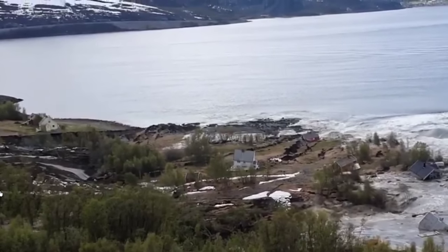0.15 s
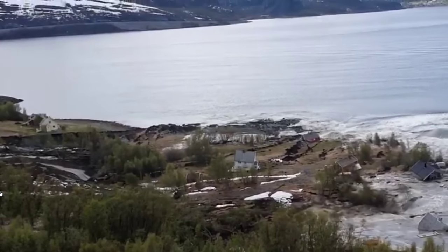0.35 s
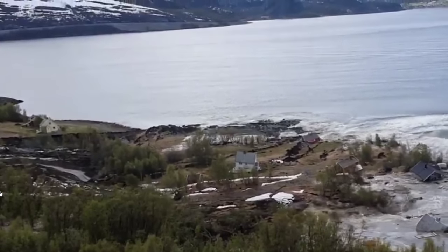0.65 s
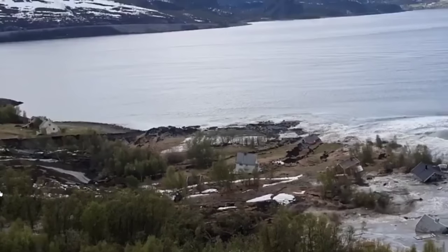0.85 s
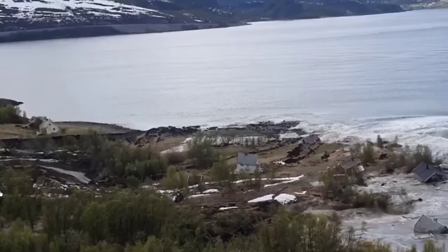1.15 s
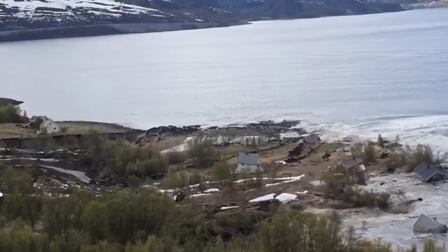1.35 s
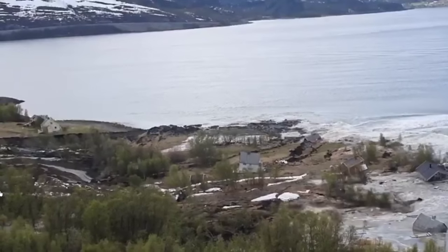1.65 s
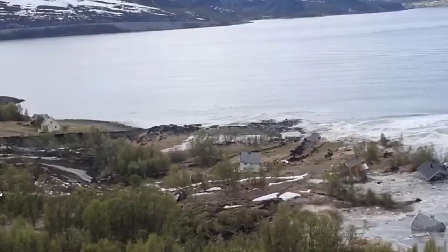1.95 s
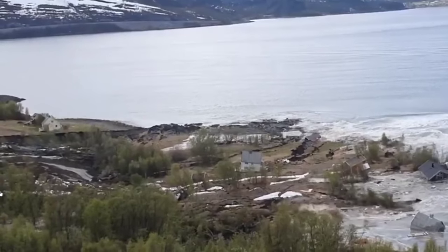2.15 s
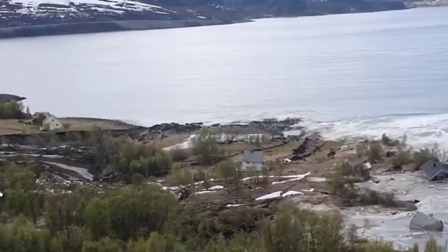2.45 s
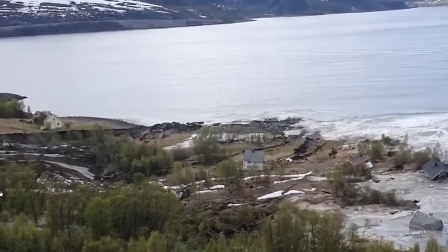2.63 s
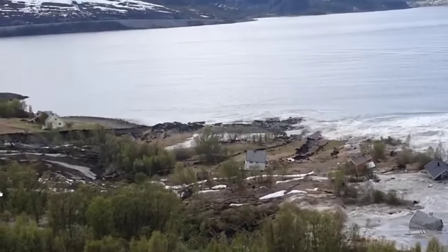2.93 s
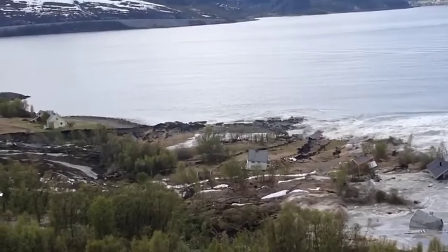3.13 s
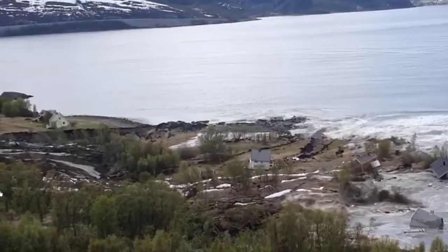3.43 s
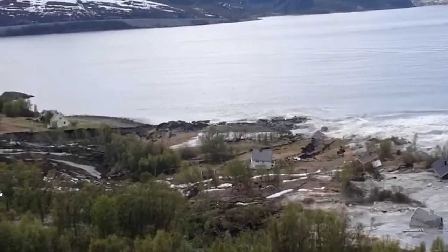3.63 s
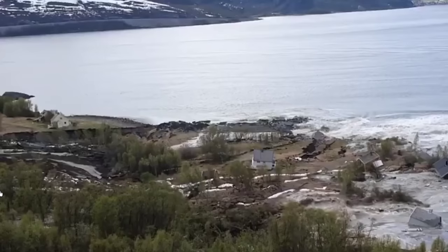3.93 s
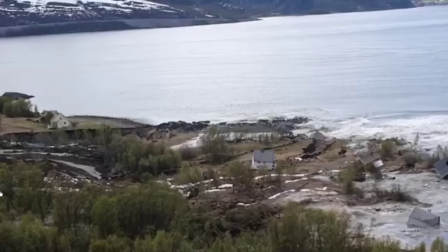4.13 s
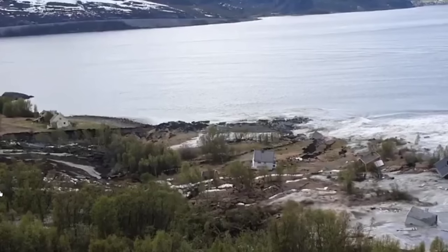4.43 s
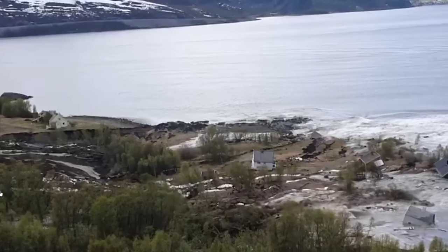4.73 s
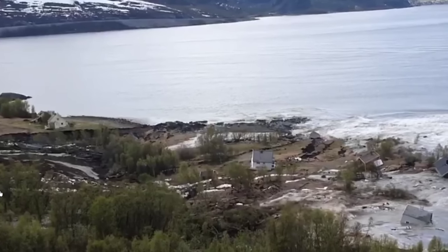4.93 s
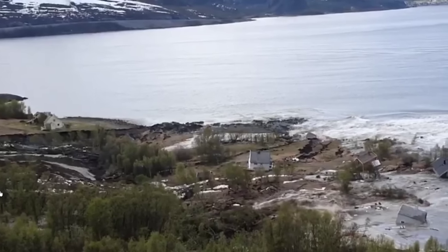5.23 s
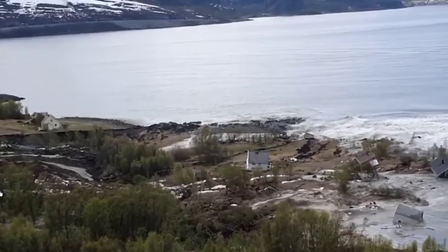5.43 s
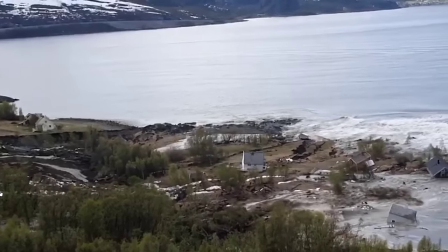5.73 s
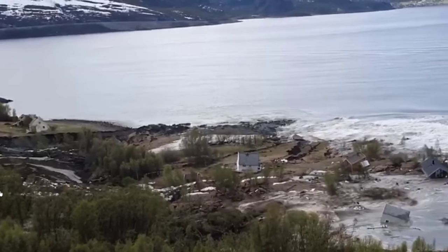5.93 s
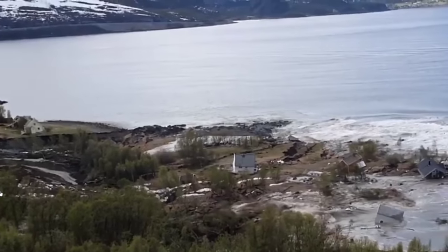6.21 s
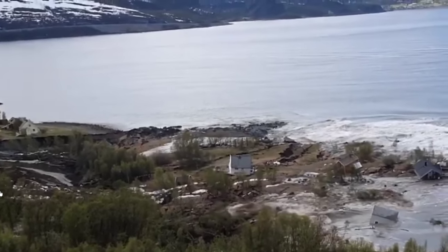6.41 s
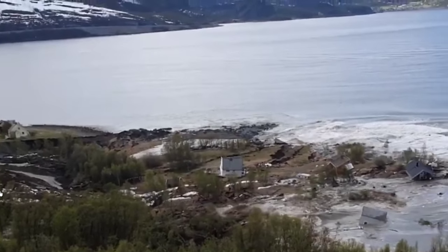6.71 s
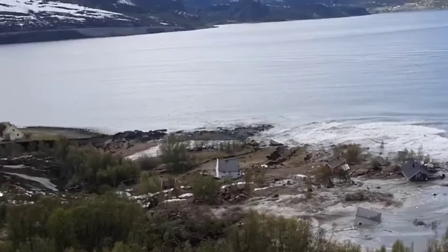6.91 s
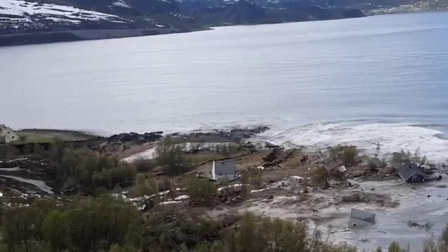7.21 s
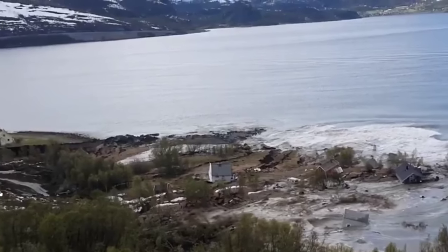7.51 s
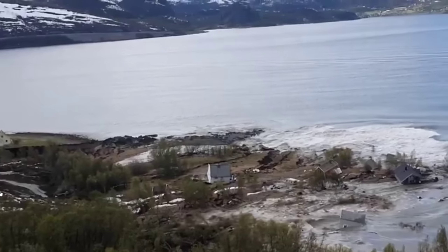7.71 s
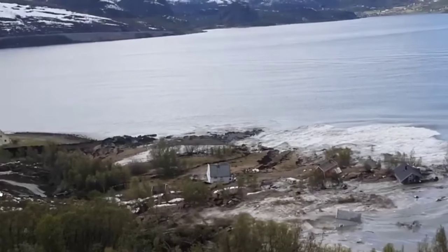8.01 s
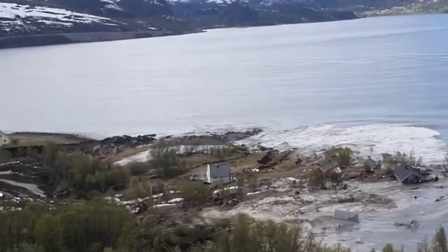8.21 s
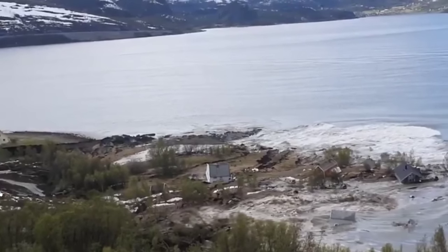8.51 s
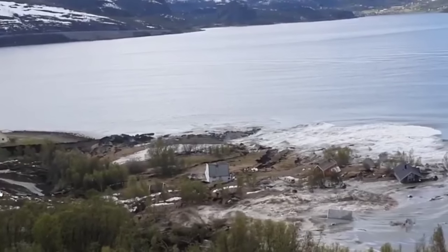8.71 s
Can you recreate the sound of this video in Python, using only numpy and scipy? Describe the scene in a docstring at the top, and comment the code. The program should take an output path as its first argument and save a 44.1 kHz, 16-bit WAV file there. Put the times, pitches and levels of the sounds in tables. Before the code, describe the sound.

Outdoors on a hillside above the sea, wind rumbles and thumps on the microphone over the constant distant roar of sliding earth and churning water. Wood breaks with sharp cracks and ragged splitting right away, and again a few seconds later. Smaller clusters of snaps come after, over a light crackle of debris. Toward the end the breaks thin out, a few twigs tick and the wind grows stronger.

```python
"""A landslide pours into the sea far below: churning earth and water make a steady roar. Trees and timber snap,
each break sounding through three coloured bands, and twice they split in a long run of small slips. Small
debris crackles, thin twigs tick, and the breaking wood echoes off the slope. Wind buffets and thumps both
microphone openings, and something close by rustles faintly."""
import sys
import numpy as np
from scipy import signal
from scipy.fft import rfft, irfft, next_fast_len
from scipy.io import wavfile
from scipy.ndimage import uniform_filter1d, map_coordinates

SR = 44100
rng = np.random.default_rng(int(sys.argv[2]) if len(sys.argv) > 2 else 0)


def store_wav(level_fs):
    """Save 16-bit WAV to argv[1]."""
    pcm = np.round(np.clip(np.atleast_2d(level_fs), -1, 1) * 32767)
    wavfile.write(sys.argv[1], SR, pcm.T.astype(np.int16))


N = 390726


def amp(db):
    """Turn decibels into a gain to multiply by."""
    return 10 ** (np.asarray(db) / 20)


def unit(x):
    """Scale a signal to an average (rms) strength of 1."""
    return x / np.sqrt(np.mean(x ** 2) + 1e-20)


def along(points, hz):
    """Read between (f/Hz, value) points on a log frequency axis."""
    freqs, values = np.transpose(points)
    return np.interp(np.log(hz + 1), np.log(freqs + 1), values)


def curves(rows):
    """One value per sample for each column after the time."""
    times, *columns = np.transpose(rows)
    return [np.interp(np.arange(N) / SR, times, column) for column in columns]


def wobble(rate):
    """A smooth curve through `rate` random values a second."""
    return map_coordinates(rng.standard_normal(int(N * rate / SR) + 4), [np.arange(N) * rate / SR])


def filtered(x, response):
    """Multiply each frequency in x by response(hz)."""
    size = next_fast_len(N + SR // 2)
    return irfft(rfft(x, size) * response(np.fft.rfftfreq(size, 1 / SR)), size)[..., :N]


def rush(spectrum, likeness, patchy_db):
    """Stereo noise of strength 1 with random louder and softer patches in time and pitch."""
    cells = signal.stft(rng.standard_normal((2, N + 512)), nperseg=512)[2]
    patches = uniform_filter1d(rng.standard_normal(cells.shape[1:]), size=6, axis=0)
    patches = uniform_filter1d(patches, size=10, axis=1)
    pair = signal.istft(cells * amp(patchy_db * unit(patches)), nperseg=512)[1][:, :N]

    def colour(hz):
        angle = np.arccos(np.clip(along(likeness, hz), -1, 1)) / 2  # 0 makes left and right the same
        return amp(along(spectrum, hz)) * [np.cos(angle), np.sin(angle)]
    mid, side = filtered(pair, colour)
    return unit(np.array([mid + side, mid - side]))


def rattle(blows, t60):
    """Noise that jumps at each blow, then fades by 60 dB in t60 seconds."""
    fade = amp(-60 / (t60 * SR))
    return signal.lfilter([1], [1, -fade], blows) * rng.standard_normal(N)


def slide():
    """Earth and water churn; tumbling debris roughens the roar in soft-edged swells."""
    # strength of the roar: t/s, level/dB
    loudness = [(0, -27), (.7, -28), (2.3, -29.5), (3, -27), (3.8, -28), (5.3, -28), (6.6, -29),
                (8.5, -27.5), (8.86, -29)]
    # tone of the roar: f/Hz, level/dB
    spectrum = [(88, -39.5), (150, -9), (276, -2), (356, -2), (475, -6), (515, -3), (655, -1), (1240, -10),
                (1550, -11), (1750, -7), (1940, -9), (2160, -19.5), (2450, -13.5), (2650, -18), (3050, -16),
                (3600, -19.5), (3800, -23.5), (4150, -23.5), (4400, -32.5), (4680, -27), (5090, -32.5),
                (6900, -35.5), (8970, -77.5), (15200, -120)]
    # how alike left and right are: f/Hz, likeness (1 = the same)
    likeness = [(60, 0.23), (180, 1), (550, 0.87), (1650, 0.64), (3500, 0.62), (4970, 0.13), (6500, .05)]
    roar_db, = curves(loudness)
    knocks = (rng.random(N) < 60 / SR) * rng.uniform(0, .35, N)  # about 60 a second
    t = np.arange(SR // 10) / SR
    swell = amp(-60 * t / 0.12) * (1 - np.exp(-t / 0.00069)) ** 2
    tumble = 1 + signal.fftconvolve(knocks, swell)[:N]
    churn = tumble * rush(spectrum, likeness, patchy_db=1.39)
    return amp(roar_db + 0.26 * wobble(5.5)) * unit(churn)


def wind():
    """Swirling air buffets each microphone, brighter as it grows; the strongest swirls thump."""
    # strength of the buffeting: t/s, level/dB
    loudness = [(0, -28), (.42, -28.5), (1.0, -29), (1.73, -29), (2.3, -29), (2.8, -26), (3.0, -31),
                (3.3, -30.5), (3.6, -31.5), (4.64, -32), (5.5, -34.5), (5.85, -27.5), (6.46, -28),
                (6.78, -25), (7.2, -25.5), (7.38, -25.5), (7.72, -24.5), (7.92, -25.5), (8.1, -25),
                (8.3, -25), (8.52, -25), (8.86, -25.5)]
    # tone of the buffeting: f/Hz, level/dB
    spectrum = [(12, -48.5), (20, -11.5), (81, 2.5), (161, -7), (244, -9), (341, -9), (447, -14.5),
                (900, -31.5), (1170, -55.5), (1980, -120)]
    # the strongest swirls: t/s, level/dB, f/Hz
    thumps = [(0.009, -18.5, 95), (.5, -20, 90), (.53, -19.5, 90), (0.564, -16, 89.4), (.61, -21.5, 85),
              (.2, -19, 70), (.43, -20, 75), (0.813, -23.5, 98.4), (0.951, -19, 64), (1, -15.5, 85),
              (1.151, -21, 66.5), (1.209, -16.5, 79.4), (1.34, -25, 85), (1.516, -23.5, 75.3),
              (1.59, -17, 103.6), (1.88, -25, 110), (1.942, -19, 70), (2.025, -18.5, 85.6),
              (2.146, -15.5, 84), (2.296, -15, 77.3), (2.36, -20.5, 94.4), (2.45, -22, 86),
              (2.501, -18.5, 111), (2.687, -13, 80.3), (2.818, -26.5, 80), (2.881, -22, 83.3),
              (3.111, -19.5, 74.5), (3.327, -19, 86.4), (4.035, -20, 87), (5.75, -22.5, 65.4),
              (5.935, -18, 101.6), (6.24, -21, 70.7), (6.371, -19.5, 70.3), (6.544, -21, 78),
              (6.766, -15, 98), (6.796, -14, 82.5), (6.83, -14, 81.3), (7.062, -19, 76.6),
              (7.142, -14.5, 97), (7.228, -17, 100), (7.31, -22.5, 80), (7.425, -19, 62.5),
              (7.514, -22.5, 99.5), (7.599, -14.5, 87.5), (7.678, -11, 110.7), (7.735, -19, 62),
              (7.799, -19, 54.5), (7.98, -22.5, 82), (8.105, -19, 404), (8.157, -14.5, 394),
              (8.183, -12.5, 445), (8.205, -11.5, 83.6), (8.345, -20, 60), (8.4, -19.5, 108.6),
              (8.427, -17, 67.5), (8.512, -8.5, 102), (8.532, -12, 94.5), (8.6, -16.5, 90),
              (8.802, -19, 212), (8.819, -20, 70)]
    veer_db, flutter_hz, octave_db = 1.5, 150, -9
    level_db, = curves(loudness)
    pan_db = veer_db * wobble(3.8)  # drifts slowly between left and right
    lean_db = np.array([pan_db, -pan_db]) / 2
    slow, fast = (np.array([wobble(rate), wobble(rate)]) for rate in (16, 35))
    lumps = amp(2.14 * slow + 1.63 * fast)
    buffet = unit(lumps * rush(spectrum, likeness=[(30, -0.13)], patchy_db=0.5))
    flutter = filtered(buffet, lambda hz: 1 / (1 + (flutter_hz / (hz + 1)) ** 4))
    buffet += (amp(level_db - level_db.mean()) - 1) * flutter  # the highs grow faster than the lows
    out = np.pad(amp(level_db + lean_db) * buffet, ((0, 0), (0, SR)))
    for s, db, hz in thumps:
        start, cycles = round(s * SR), 2.66 * (hz / 90) ** 0.37
        t = np.arange(round(cycles / hz * SR)) / SR
        phase = 2 * np.pi * hz * t + rng.uniform(0, 2 * np.pi)
        # the lower the thump, the more the two sides are out of step
        phase = phase + rng.normal(0, 0.65 * np.sqrt(90 / hz), (2, 1))
        side_db = db + lean_db[:, [start]] + rng.normal(0, 1, (2, 1))
        tone = np.sin(phase) + amp(octave_db) * np.sin(2 * phase)
        out[:, start:start + len(t)] += amp(side_db) * np.hanning(len(t)) * tone
    return out[:, :N]


def rustle():
    """A thin, high hiss close by that swells briefly now and then."""
    # brief swells: t/s, level/dB, length/s
    rustles = [(1.285, -69.5, 0.022), (2.624, -61.5, 0.062), (3.607, -74, 0.045), (3.81, -61, 0.066),
               (5.943, -60.5, .14), (6.454, -65.5, 0.15), (6.649, -58.5, .09), (7.614, -66.5, 0.022),
               (8.822, -58.5, 0.11)]
    # tone of the hiss: f/Hz, level/dB
    spectrum = [(6500, -21.5), (7800, -7.5), (9500, -5), (11700, -0.5), (14500, -5), (15700, -6)]
    hiss_db, t = -74.5, np.arange(N) / SR
    swells = sum(amp(db) * np.exp(-8 * ((t - s) / length) ** 2) for s, db, length in rustles)
    flicker = amp(1.2 * wobble(150))
    return (amp(hiss_db) + swells) * flicker * rush(spectrum, likeness=[(9000, .8)], patchy_db=1.5)


def snap_colour(force, band):
    """A force sounds through one band of fixed resonant peaks (0 thud, 1 crack, 2 bright edge); distance dulls
    it."""
    # resonant peaks, one list per band: f/Hz, width/Hz, level/dB
    resonances = [
        [(634, 224, 5.5), (1030, 155, 4.5)],
        [(1364, 305, -4), (1880, 197, 1)],
        [(2480, 424, 12.5), (3240, 605, 15.5), (4480, 1240, 3.5)],
    ]

    def ring(hz):
        return sum((-1) ** k * amp(db) * 1j * hz * width / (centre ** 2 - hz ** 2 + 1j * hz * width)
                   for k, (centre, width, db) in enumerate(resonances[band]))
    return filtered(force, lambda hz: ring(hz) / (1 + 1j * hz / 4200) ** 4)


def splits():
    """A trunk's fibres let go in uneven slips, each a small break and rattle of its own size."""
    # one list per splitting trunk: t/s, crack level/dB, thud over crack/dB, edge over crack/dB
    trunks = [
        [(0, -21.5, 3, -8), (.07, -32, -7.5, -5), (.13, -23, -1.5, -4.5), (.18, -31, 2.5, 1),
         (.192, -24.5, -12, -4), (.26, -25.5, 0, -8), (.33, -27.5, -4, -4.5), (.44, -26.5, -13, -14)],
        [(3.0, -38, 1, 1), (3.12, -32, 1.5, 2), (3.22, -33.5, 6.5, 4), (3.3, -33, 6, -5), (3.4, -33, 5, 1),
         (3.44, -41.5, 3, 2), (3.5, -39, 5, 2), (3.58, -35, 1, 1)],
    ]
    slips_per_s, pace_spread_db, size_spread_db = 100, 1.2, 2
    out, t = np.zeros(N), np.arange(N) / SR
    for rows in trunks:
        crack_db, thud_db, edge_db = curves(rows)
        count = np.cumsum(slips_per_s / SR * amp(pace_spread_db * wobble(60)))
        slips = np.diff(np.floor(count), prepend=0) * amp(size_spread_db * rng.standard_normal(N))
        force = rattle(slips, t60=0.053) + 0.89 * slips
        fade = np.clip(np.minimum(t - rows[0][0] + 0.012, rows[-1][0] - t) / 0.039, 0, 1)
        bands = [unit(snap_colour(force, band)) * amp(db) for band, db in enumerate([thud_db, 0, edge_db])]
        out += fade * amp(crack_db) * sum(bands)
    return out


def crackle():
    """Small debris breaks at random throughout; each band has its own breaks."""
    # strength of the crackle: thud/dB, crack/dB, edge/dB
    levels = [-42.5, -47, -51]
    breaks_per_s, spread_db = 30, 2.5
    breaks = (rng.random((3, N)) < breaks_per_s / SR) * amp(spread_db * rng.exponential(size=(3, N)))
    return sum(amp(db) * unit(snap_colour(rattle(breaks[band], t60=0.048), band))
               for band, db in enumerate(levels))


def snaps():
    """Timber snaps: one sharp break and a dying rattle of fibres sound in all three bands."""
    # single snaps and their peak in each band: t/s, crack/dB, thud/dB, edge/dB
    breaks = [(.0075, -26, -28, -21), (0.036, -23, -35, -21), (0.064, -18, -17.5, -18),
              (0.083, -15, -19, -17), (0.099, -10.5, -22, -11), (.114, -17, -25, -24),
              (0.1215, -12, -19.5, -22), (0.1275, -8, -23, -13), (.134, -14, -23, -20),
              (0.141, -8.5, -12.5, -24), (.153, -15, -22.5, -24), (0.187, -5.5, -13.5, -31),
              (.196, -13, -24, -24), (.205, -16, -14, -14.5), (0.2192, -17, -13.5, -14),
              (0.2127, -21, -17.5, -24), (0.23, -16, -19, -23), (0.237, -16, -25, -23),
              (0.2586, -23, -14, -20), (0.2771, -12.5, -23, -25), (.29, -15, -19, -20),
              (0.3, -11.5, -18, -27), (.31, -19, -16, -24), (0.3457, -16, -23.5, -27),
              (0.364, -15, -22, -28), (0.3902, -15.5, -19, -36), (0.418, -12.5, -14, -35),
              (0.4736, -17, -9.5, -27), (0.5058, -19.5, -30, -34), (0.6563, -24, -18, -40),
              (1.5386, -26, -18, -38), (2.092, -27, -21, -29), (2.175, -19.5, -46, -31),
              (2.557, -22, -39, -26), (2.651, -36, -35, -21.5), (2.733, -24, -31, -24),
              (2.7533, -19, -33, -21), (2.808, -19, -19, -13.5), (2.829, -19, -21, -22),
              (2.862, -19, -19.5, -16.5), (2.8968, -23, -33, -29), (2.92, -26, -17, -15.5),
              (2.9725, -15, -18.5, -16), (3.0008, -17, -12.5, -11), (3.0317, -16, -20, -15),
              (3.0444, -15.5, -22, -25), (3.058, -21, -11.5, -11), (3.068, -19, -16.5, -16),
              (3.0954, -19, -17, -17), (3.1133, -18, -12.5, -15), (3.136, -20, -13, -19),
              (3.1507, -15.5, -11.5, -23), (3.1705, -13, -9.5, -9), (3.1835, -29, -19.5, -15),
              (3.198, -17, -15.5, -14), (3.214, -20, -24, -7.5), (3.22, -20, -19, -16),
              (3.2285, -18, -15, -8), (3.239, -21, -14, -10.5), (3.249, -19, -11, -9),
              (3.2647, -19, -12.5, -9), (3.275, -14.5, -21, -9), (3.2881, -21, -16.5, -16),
              (3.297, -17, -13.5, -11.5), (3.3045, -13, -14.5, -10.5), (3.3196, -14, -13, -12),
              (3.3317, -9.5, -17, -9.5), (3.3397, -20, -18, -12), (3.35, -21, -9, -13),
              (3.3594, -19, -11, -14), (3.369, -26, -12, -11), (3.379, -18, -9, -11.5),
              (3.39, -25, -13, -9), (3.3989, -12, -14.5, -20), (3.4202, -13, -13, -12),
              (3.4462, -14, -14.5, -14.5), (3.457, -14, -19, -18), (3.4666, -16.5, -27, -12),
              (3.474, -24, -13, -17), (3.483, -27, -18.5, -21), (3.4943, -15, -20, -16),
              (3.506, -25, -16, -26), (3.525, -18, -17, -15.5), (3.538, -14.5, -21, -24),
              (3.548, -19, -25, -25), (3.594, -15, -13.5, -24), (3.62, -18.5, -13.5, -26),
              (3.741, -21, -19.5, -24), (3.7857, -28, -14, -27), (4.2067, -32, -24, -31),
              (4.3573, -21, -31, -40), (4.79, -21, -22, -24), (4.8018, -15.5, -14.5, -24),
              (4.831, -18.5, -28, -24), (4.885, -17.5, -33, -23), (4.95, -17, -19.5, -20.5),
              (5.078, -21, -18.5, -25), (5.0824, -14.5, -15.5, -18), (5.089, -19, -20, -23),
              (5.1955, -18, -24, -28), (5.206, -24, -16, -32), (5.213, -20, -28, -32),
              (5.222, -21, -22, -29), (5.349, -30, -25, -36), (5.366, -25, -28, -33),
              (5.4188, -23, -25, -38), (5.429, -22, -23, -39), (5.4396, -18.5, -22, -37),
              (5.723, -15, -20.5, -24), (5.728, -21, -30, -30), (6.608, -23, -18, -28),
              (6.6136, -15.5, -26, -33), (6.9438, -27, -17, -34), (7.5116, -22, -19, -36),
              (7.715, -22, -29, -30), (7.802, -21, -35, -40), (7.816, -29, -23, -33),
              (7.931, -31, -24, -38), (7.998, -30, -20, -31), (8.061, -29, -21, -21),
              (8.3052, -34, -30, -35), (8.4419, -31, -21, -34), (8.6294, -25, -25, -28)]
    rattle_s, break_force, pitch_spread = 0.042, 8.8, .025
    out, t = np.zeros(N + SR), np.arange(SR // 8) / SR
    rings = [snap_colour(signal.unit_impulse(N), band)[:len(t)] for band in range(3)]
    for s, crack_db, thud_db, edge_db in breaks:
        force = amp(-60 * t / rattle_s) * rng.standard_normal(len(t))
        force[0] += break_force
        for ring, db in zip(rings, [thud_db, crack_db, edge_db]):
            pitch = np.exp(rng.normal(0, pitch_spread))  # each snap's colour sits a little higher or lower
            snap = signal.fftconvolve(force, np.interp(t * pitch, t, ring))[:len(t)]
            out[round(s * SR):][:len(t)] += amp(db) * snap / np.abs(snap).max()
    return out[:N]


def hillside(x, t60, dull_hz):
    """Slope and trees scatter echoes, different at each microphone."""
    t = np.arange(SR // 2) / SR
    tail = rng.standard_normal((2, len(t))) * amp(-60 * t / t60)
    echoes = signal.fftconvolve(x[None], tail / np.linalg.norm(tail[0]), axes=1)[:, :N]
    return filtered(echoes, lambda hz: 1 / (1 + 1j * hz / dull_hz))


def twigs():
    """Thin twigs break with short, bright ticks that have no body."""
    # breaking twigs: t/s, force/dB
    ticks = [(3.954, -14), (7.437, -16), (7.577, -21), (7.6176, -19), (7.685, -20), (7.699, -17),
             (7.805, -30), (8.52, -23), (8.5943, -18), (8.7035, -19)]
    fade_s, ring_hz, width_hz, dull_hz = 0.059, 4100, 3600, 5000
    force, t = np.zeros(N + SR), np.arange(SR // 20) / SR
    for s, db in ticks:
        force[round(s * SR):][:len(t)] += amp(db - 60 * t / fade_s) * rng.standard_normal(len(t))
    ring = lambda hz: 1j * hz * width_hz / (ring_hz ** 2 - hz ** 2 + 1j * hz * width_hz)
    return filtered(force[:N], lambda hz: ring(hz) ** 3 / (1 + 1j * hz / dull_hz) ** 4)


def scene():
    """The far slide and its timber lose their highest treble; wind and rustle are close."""
    far_top_hz, lead_s = 7034, 3e-5  # the slide reaches the left microphone first
    timber = snaps() + splits() + twigs() + crackle()
    far = timber + amp(-10.0) * hillside(timber, t60=0.19, dull_hz=6000) + slide()
    left_first = lambda hz: np.exp(1j * np.pi * hz * lead_s * np.array([[1], [-1]]))
    far = filtered(far, lambda hz: left_first(hz) / (1 + (hz / far_top_hz) ** 70))
    return far + wind() + rustle()


def record(dry):
    """The two microphones differ a little in tone and keep nothing above top_hz."""
    # balance of the microphones: f/Hz, left minus right/dB
    balance = [(60, 1.5), (180, 0), (550, 1), (1650, -0.5), (4970, -2.5), (15000, 0.5)]
    top_hz, sides = 15750, np.array([[1], [-1]])
    return filtered(dry, lambda hz: amp(sides * along(balance, hz) / 2) * (hz < top_hz))


dry = scene()
out = record(dry)
store_wav(out)
```